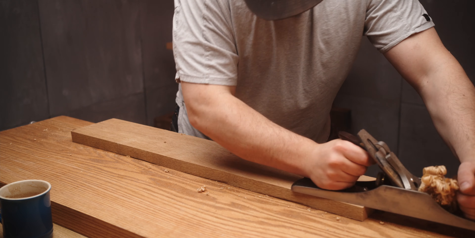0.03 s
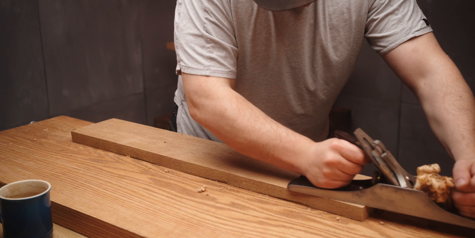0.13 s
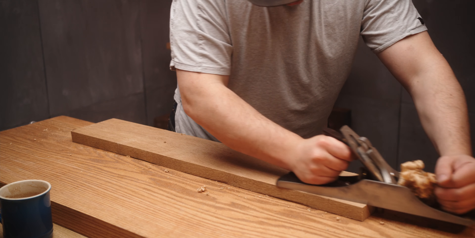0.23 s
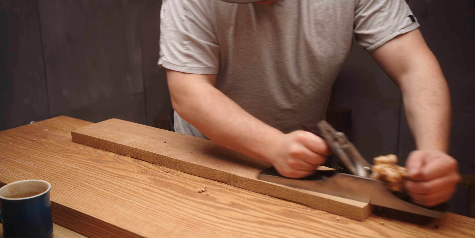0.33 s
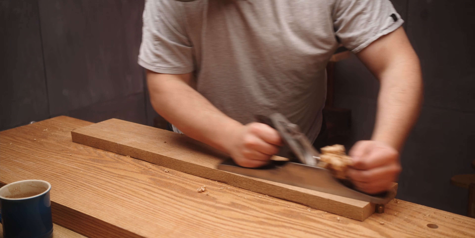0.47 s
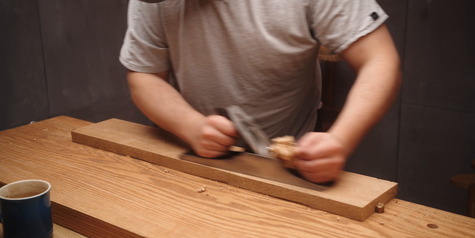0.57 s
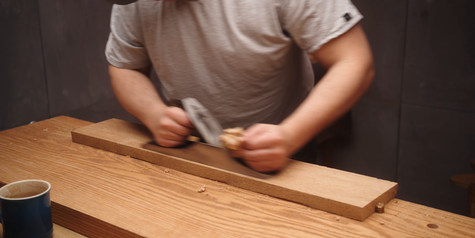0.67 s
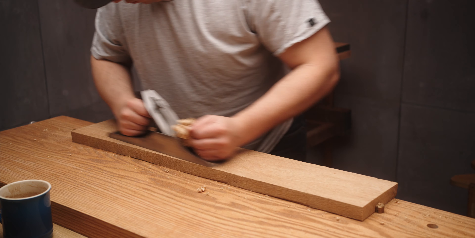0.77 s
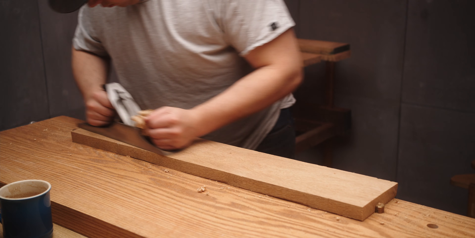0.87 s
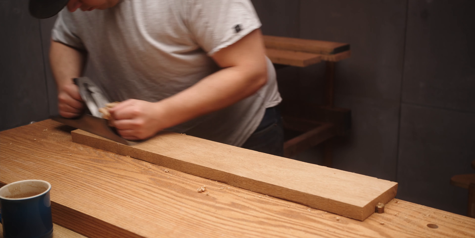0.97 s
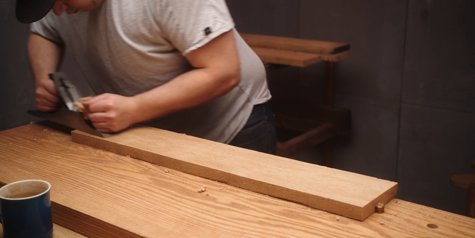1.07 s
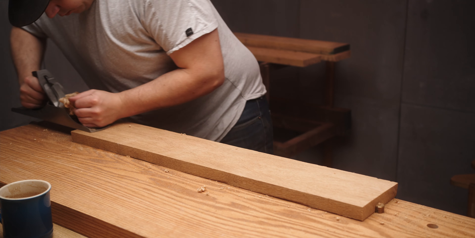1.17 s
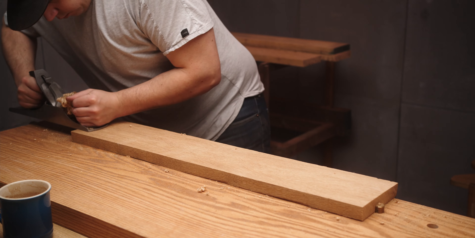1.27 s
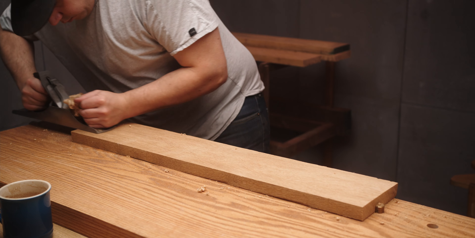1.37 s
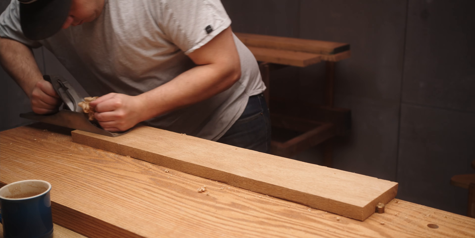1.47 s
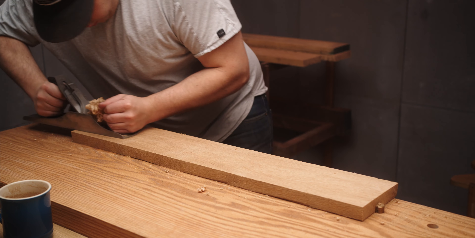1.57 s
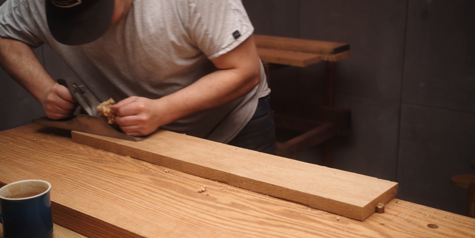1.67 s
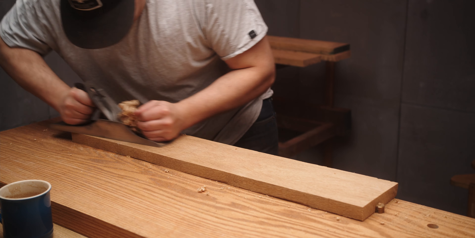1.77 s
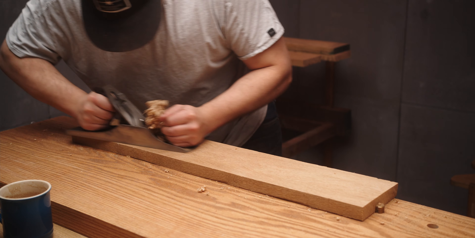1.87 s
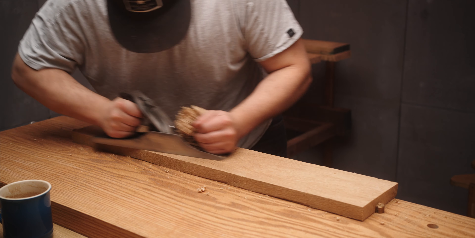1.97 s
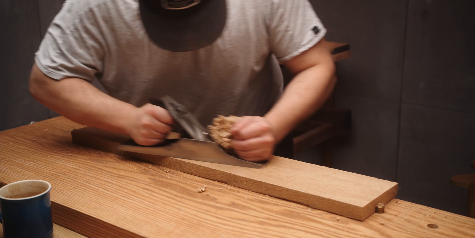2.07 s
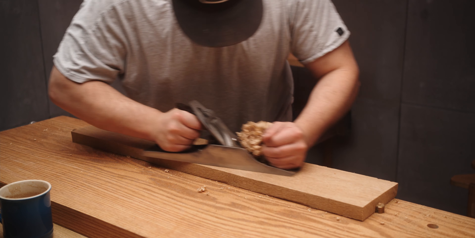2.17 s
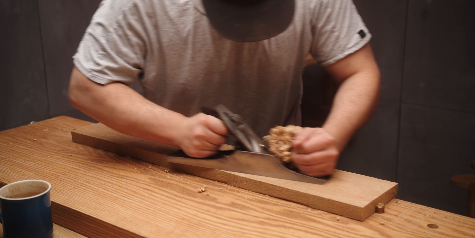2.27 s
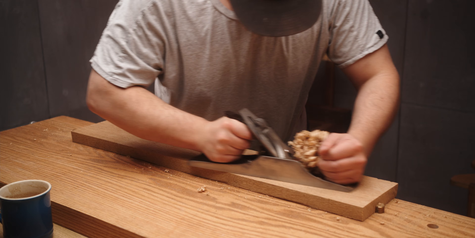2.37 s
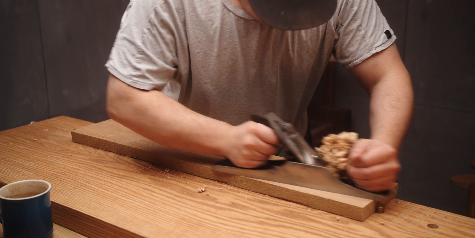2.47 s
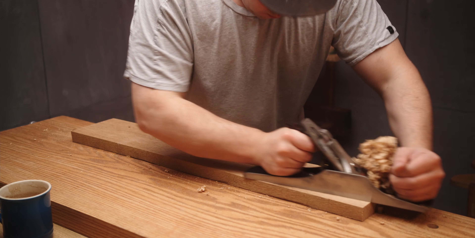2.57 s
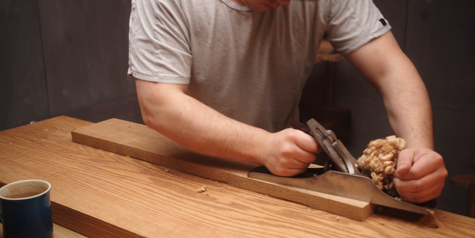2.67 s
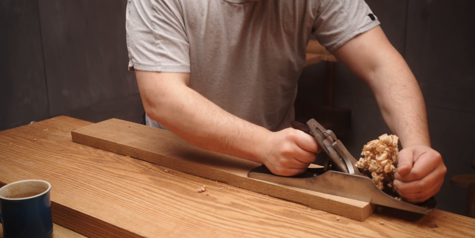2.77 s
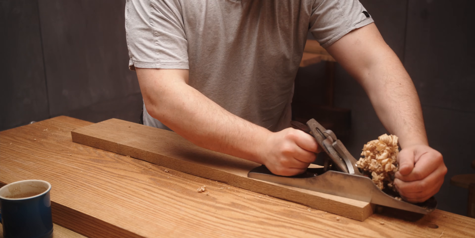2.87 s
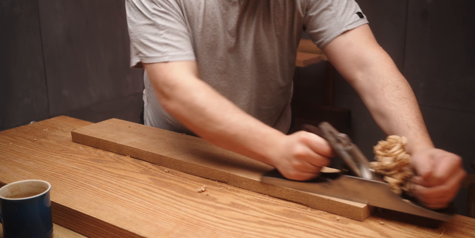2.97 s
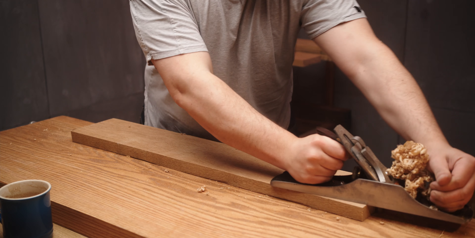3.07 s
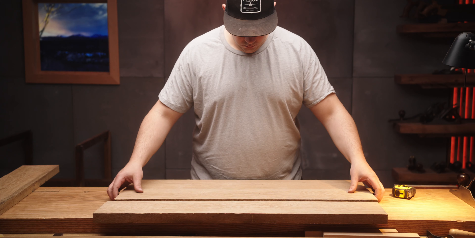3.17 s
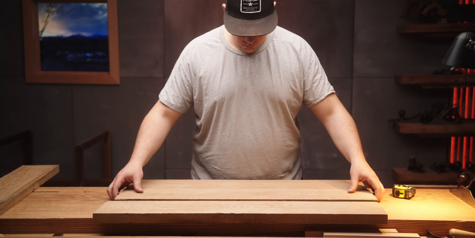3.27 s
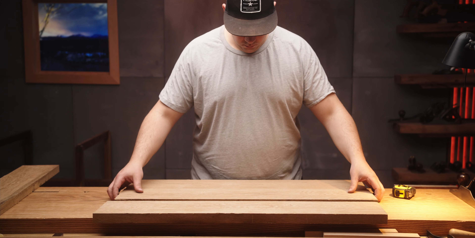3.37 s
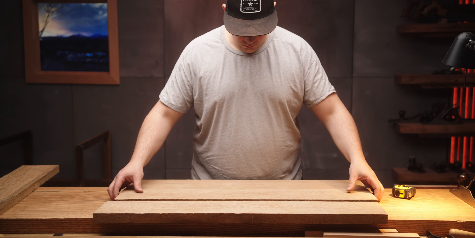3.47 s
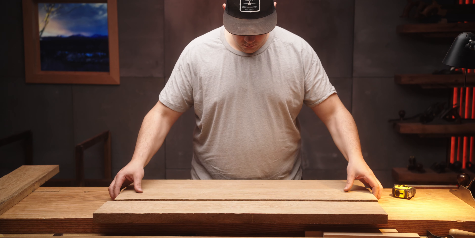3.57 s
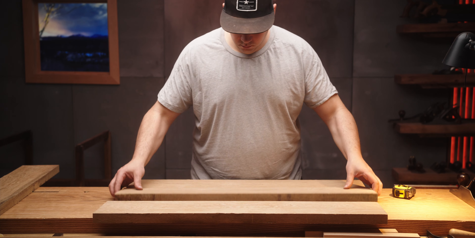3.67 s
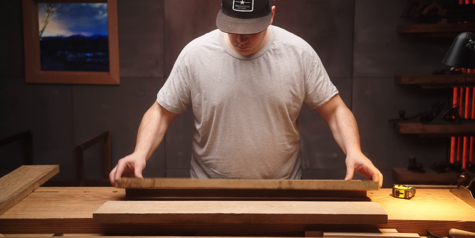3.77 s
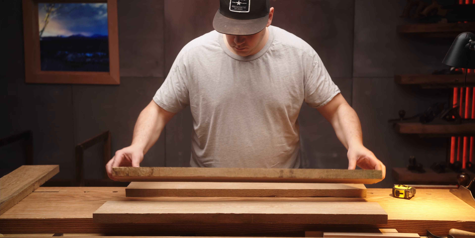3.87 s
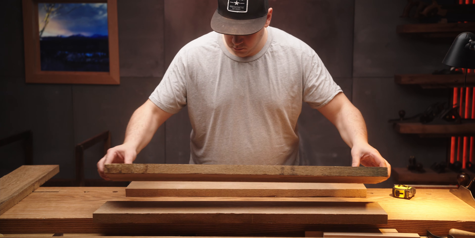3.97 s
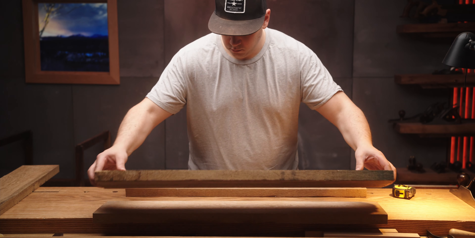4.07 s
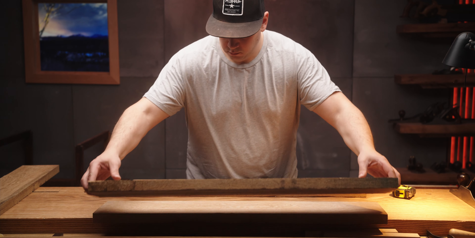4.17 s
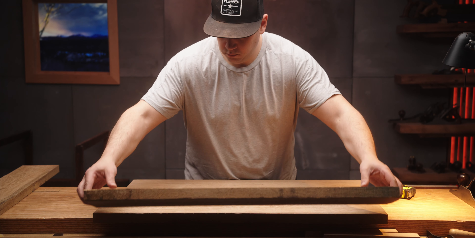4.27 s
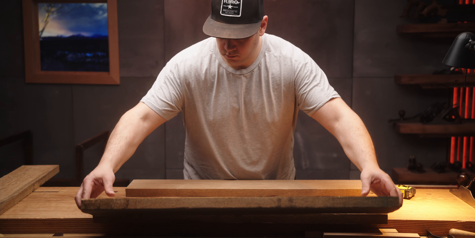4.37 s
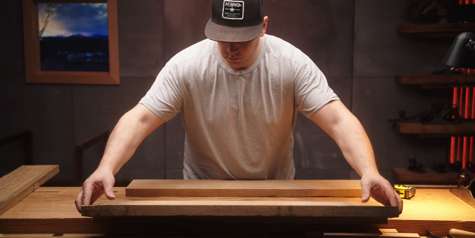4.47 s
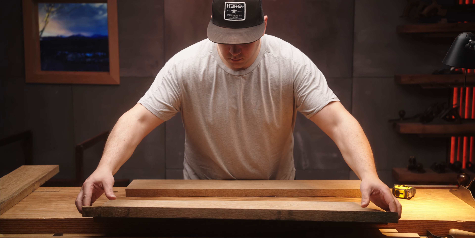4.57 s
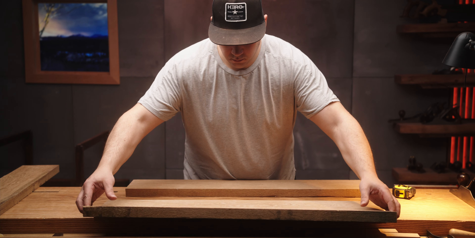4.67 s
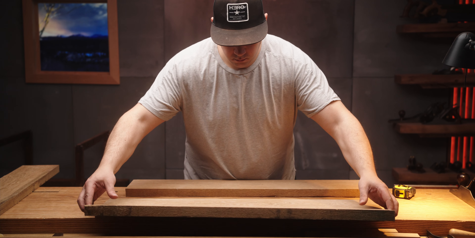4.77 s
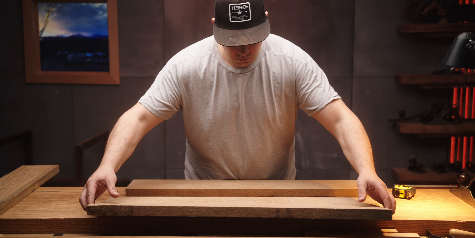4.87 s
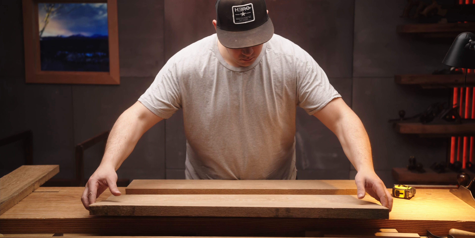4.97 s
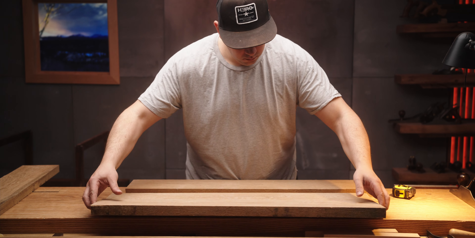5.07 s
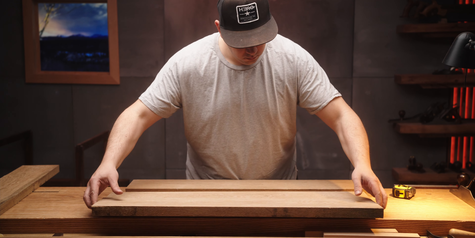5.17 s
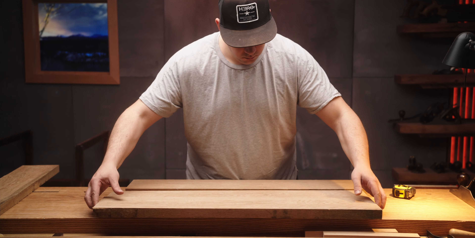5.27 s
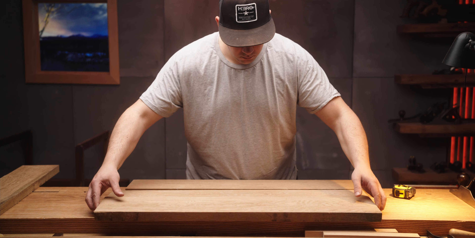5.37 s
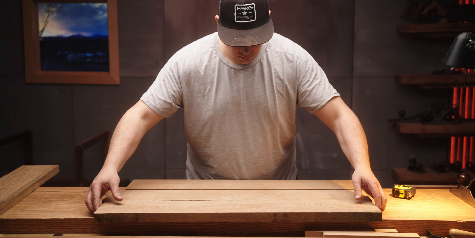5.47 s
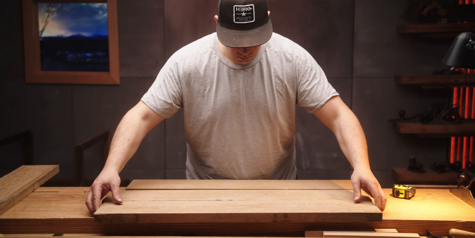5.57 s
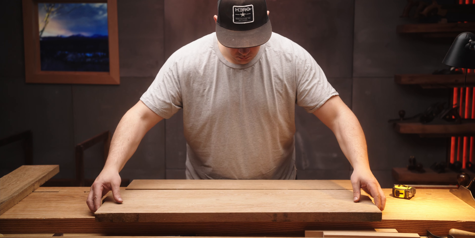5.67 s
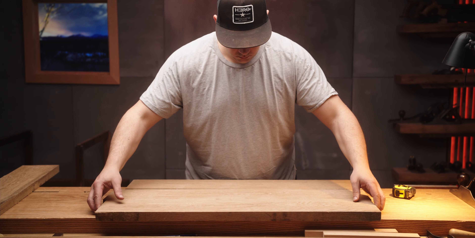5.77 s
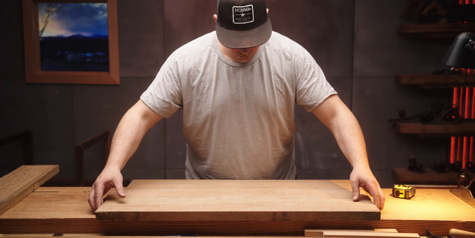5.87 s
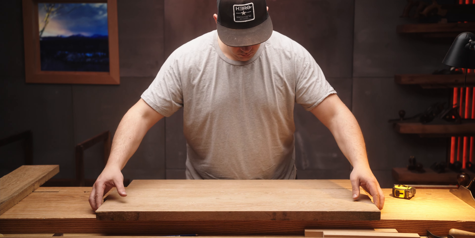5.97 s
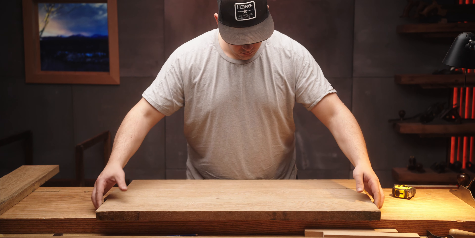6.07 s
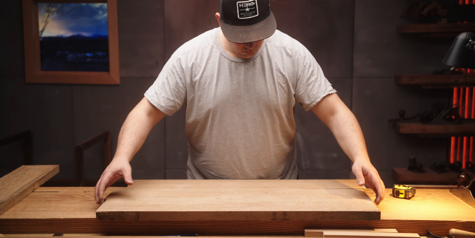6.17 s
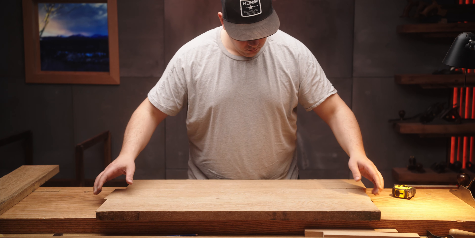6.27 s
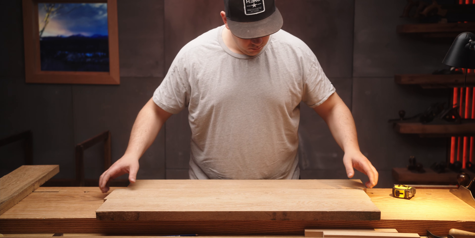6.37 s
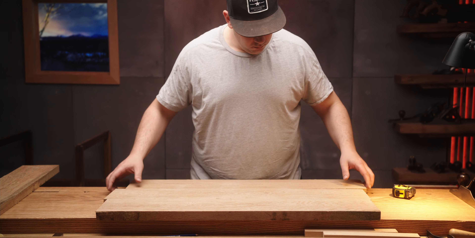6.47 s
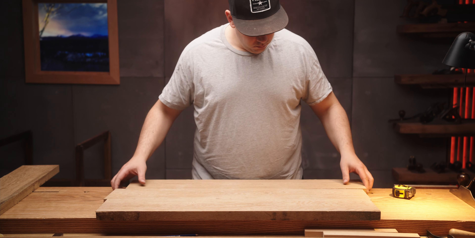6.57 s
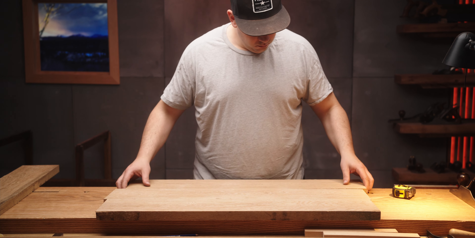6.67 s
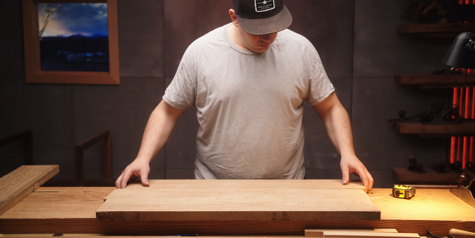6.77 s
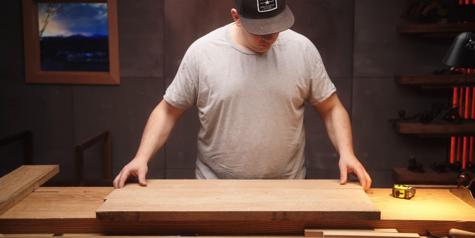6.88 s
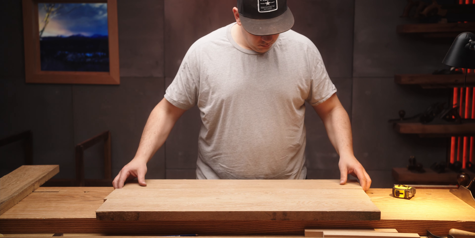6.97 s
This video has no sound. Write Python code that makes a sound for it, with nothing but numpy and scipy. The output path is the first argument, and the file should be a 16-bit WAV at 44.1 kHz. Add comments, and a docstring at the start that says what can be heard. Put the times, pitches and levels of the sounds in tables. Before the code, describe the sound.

A metal hand plane hisses over a wooden board, then a board knocks, slides and slaps down on a workbench.

```python
"""A long metal hand plane is dragged back over a board and pushed through a hissing cut.
Each stroke speeds up and slows: the shaving crackles most at speed, the blade chatters most when slow.
After an abrupt change of scene a board is lifted off a stack, set on edge on the bench,
slid into place and let fall flat. Rumble and a faint hum fill the bare, ringing workshop."""
import sys
import numpy as np
from scipy import signal
from scipy.fft import rfft, irfft, next_fast_len
from scipy.io import wavfile
from scipy.ndimage import uniform_filter1d, map_coordinates

SR = 44100
rng = np.random.default_rng(int(sys.argv[2]) if len(sys.argv) > 2 else 0)


def dump_mix(stems):
    """Bounce the given channels to the path in sys.argv[1] as a 16-bit WAV at rate SR."""
    frames = np.atleast_2d(stems).T  # one column per channel
    limited = np.clip(frames, -1, 1)  # hard clip at full scale
    pcm = np.round(limited * 32767).astype(np.int16)
    wavfile.write(sys.argv[1], SR, pcm)


N = 309582
SCENE_CHANGE_S = 3.176

# cutting edge spectrum: (frequency [Hz], density [dB])
CUT_SPECTRUM = [(1200, -37), (2200, -14.5), (2900, -5.5), (3500, -6), (4300, -0.5), (5000, -4), (6400, -9),
                (7600, -19.5), (9300, -18.5), (10400, -41), (14000, -52.5)]
# shaving and grit spectrum: (frequency [Hz], density [dB])
CRACKLE_SPECTRUM = [(5000, -25), (9000, -2.5), (10400, -11.5), (11700, -2.5), (13000, -6), (14400, -4.5),
                    (15300, -30.5), (16000, -8.5)]
# bench modes: (frequency [Hz], level [dB], t60 [s])
BENCH_MODES = [(61.8, -16, .5), (86.7, 3, 0.17), (110.7, -0.5, 0.37)]


def planing():
    """The sole rubs on the pull; the blade bites on the push, harder in tough grain."""
    # strokes: (start [s], end [s], level [dB], pressure change [dB])
    pulls = [(0.22, 0.45, -59.5, 2.5), (0.464, 1.195, -44.5, -4), (3.005, 3.036, -43, 3)]
    pushes = [(-0.4, 0.025, -41.5, 2.5), (1.38, 1.51, -68.5, 11), (1.524, 2.69, -39.5, 4)]
    # rows hiss, rasp, crackle, chatter: (gain at rest [dB], added at full speed [dB])
    pull_mix = [(-1, 2), (-6.5, 1), (-22, 6), (-4.5, -2.5)]
    push_mix = [(-1, 2), (-14.5, -1.5), (-23, 10.5), (-6, -7)]
    # tough grain: (time [s], lift [dB], half length [s])
    tough_grain = [(0.0, 6.5, 0.015), (1.827, 2, 0.074), (2.09, 1.5, 0.039), (2.483, 3.5, 0.034),
                   (2.616, 7, 0.043)]
    # lift factors [1]: (hiss, rasp, crackle, chatter)
    tough_share = [0.86, 0.55, 1.8, 0.19]
    # rubbing sole: (frequency [Hz], density [dB])
    sole_spectrum = [(1200, -35), (2200, -11), (2800, -5.5), (3400, -2), (4200, -1), (5000, -5.5),
                     (6500, -10.5), (7600, -20), (9300, -24.5), (10400, -40), (14000, -49.5)]
    tough_db = sum(db * np.exp(-((clock() - s) / half_s) ** 2) for s, db, half_s in tough_grain)
    bite = amp(np.outer(tough_share, tough_db))
    pull = stroke(drive(pulls, pull_mix), sole_spectrum, blade_hz=2843, width_hz=160, snaps_per_s=12000,
                  judder_db=-1.83, patchy_db=2.6, tilt_db_oct=0, low_cut_hz=98, left_db=0.2)
    push = stroke(bite * drive(pushes, push_mix), CUT_SPECTRUM, blade_hz=2943, width_hz=350,
                  snaps_per_s=5000, judder_db=1.4, patchy_db=2.3, tilt_db_oct=-3.5, low_cut_hz=363,
                  left_db=1.1)
    return pull + push


def stroke(gains, spectrum, blade_hz, width_hz, snaps_per_s, judder_db, patchy_db, tilt_db_oct,
           low_cut_hz, left_db):
    """Snapping fibres ring the iron body, blade and board; the curling shaving crackles above them."""
    # plane body resonances: (frequency [Hz], width [Hz], lift [dB])
    iron_peaks = [(4220, 84, 5), (4360, 110, -1), (4834, 350, 2.5), (5290, 300, -1), (5860, 1200, 0.5),
                  (6390, 99, 3)]
    # rasping board: (frequency [Hz], density [dB])
    rasp_spectrum = [(30, -23.5), (100, 10), (190, -3), (300, -1.5), (500, -2.5), (750, -4), (1200, -2.5),
                     (2000, -1), (3000, -7.5), (6000, -50)]

    def iron_db(hz):
        peaks_db = sum(db / (1 + (2 * (hz - f) / width) ** 2) for f, width, db in iron_peaks)
        return along(spectrum, hz) + peaks_db

    def blade_db(hz):
        return -10 * np.log10(1 + (2 * (hz - blade_hz) / width_hz) ** 4)

    def board_db(hz):
        cut_db = 10 * np.log10(1 + (low_cut_hz / (hz + 1)) ** 4)
        return along(rasp_spectrum, hz) + tilt_db_oct * np.log2(1 + hz / 200) - cut_db

    hiss, rasp, crackle, chatter = gains * amp(judder_db * wobble(70))
    iron = hiss * unit(colour(patchy(grains(snaps_per_s, spread_db=5), patchy_db), iron_db))
    blade = chatter * unit(colour(grains(snaps_per_s, spread_db=7), blade_db))
    wood = rasp * unit(colour(grains(3000, spread_db=1), board_db))
    shaving = crackle * shaped(patchy(grains(1500, spread_db=1), patchy_db), CRACKLE_SPECTRUM)
    return (pan(workshop(amp(3.5) * iron + amp(1.5) * blade, wet_db=8, places=4), left_db)
            + workshop(amp(4.5) * wood, wet_db=9, places=2)
            + pan(workshop(amp(6) * shaving, wet_db=6.5, places=2), left_db=5))


def drive(strokes, mix):
    """Layer gains: all follow pressure, each with its own response to speed."""
    moves = [movement(*row, attack_s=0.016, release_s=0.015) for row in strokes]
    return np.array([sum(pressure * amp(rest_db + speed_db * speed) for pressure, speed in moves)
                     for rest_db, speed_db in mix])


def movement(start_s, end_s, db, change_db, attack_s, release_s):
    """One arm sweep: drifting pressure gain and a 0-1-0 speed bell."""
    t = clock()
    progress = np.clip((t - start_s) / (end_s - start_s), 0, 1)
    contact = np.clip(1 + np.minimum((t - start_s) / attack_s, (end_s - t) / release_s), 0, 1)
    return contact * amp(db + change_db * (progress - 0.5)), np.sin(np.pi * progress) ** 2


def plane_bumps():
    """The plane bumps over the board: the bench thuds, the sole clacks, the edge scratches."""
    # bumps: (time [s], thud [dB], clack [dB], scratch [dB])
    bumps = [(0.87, -30.5, -49, -62), (0.943, -41, -62, -67), (1.52, -37.5, -47, -31.5),
             (1.58, -39.5, -70, -58), (2.996, -58, -32.5, -55), (3.02, -59, -46, -35)]
    # sole on board: (frequency [Hz], level [dB], t60 [s])
    clack_modes = [(545, 0, 0.05), (600, 5, 0.06), (665, 0, 0.06), (740, -2, 0.06)]
    t = np.arange(SR) / SR
    thuds, clacks, scratches = np.zeros((2, N)), np.zeros((2, N)), np.zeros(N)
    damping = amp(-190 * t)  # plane's weight on the bench
    scratch_envelope = np.exp(-t / 0.017) * (1 - np.exp(-t / 0.0081))
    for s, thud_db, clack_db, scratch_db in bumps:
        add(thuds, s, amp(thud_db) * damping * ring(BENCH_MODES, attack_s=0.0063, lag_s=0.00026))
        add(clacks, s, amp(clack_db) * ring(clack_modes, attack_s=0.0045, lag_s=0.0002))
        scratch = shaped(rng.standard_normal(SR), CUT_SPECTRUM) * scratch_envelope
        add(scratches, s, amp(scratch_db) * scratch)
    return (workshop(thuds, wet_db=-2) + workshop(clacks, wet_db=10.5)
            + pan(workshop(scratches, wet_db=-2.5), left_db=0.5))


def board_knocks():
    """Blows slap the board and ring it and the bench; the springy contact is a resonant low-pass."""
    # blows: (time [s], wood [dB], contact resonance [Hz], Q [1], bench thud [dB])
    blows = [(3.647, -70, 363, 3.4, -57), (3.727, -50, 950, 0.33, -46.5), (3.756, -62, 1000, 0.53, -43.5),
             (4.534, -56.5, 683, 0.47, -53), (4.648, -31, 800, 0.51, -43.5), (4.653, -51, 1400, 4.3, -57),
             (4.668, -39, 521, 3, -74), (5.473, -47.5, 1026, 5.3, -47.5), (5.529, -26.5, 4200, 0.62, -40),
             (5.549, -33.5, 1250, 1.8, -51.5), (5.70, -54, 760, 13, -54), (5.92, -53, 386, 0.71, -58),
             (6.228, -85.5, 825, 64, -98)]
    # board modes: (frequency [Hz], level [dB], uncapped t60 [s])
    board_modes = [(244.2, -4, 0.35), (276.4, 0, 0.65), (299, -5.5, 0.7), (334.5, -4, 0.67),
                   (435, -3.5, 0.61), (521, 4.5, 0.3), (577, -5, 0.95), (641, -4, 0.62), (716, 9, 0.16),
                   (768, -5.5, 0.79), (926, 4, 0.58), (976, -2, 0.78), (1000, 0, 0.51), (1093, -9.5, 0.63),
                   (1360, -4.5, 0.86), (1430, -8.5, 0.58), (1597, -9.5, 0.45), (1630, -5.5, 0.58),
                   (2010, -25, 0.55), (2410, -20.5, .3)]
    # wood slap: (frequency [Hz], density [dB])
    slap_spectrum = [(60, -12.5), (180, -6.5), (260, 2.5), (700, -0.5), (1100, -5), (1600, -4), (1900, -9),
                     (2700, -15.5), (4200, -8.5), (5500, -14), (7500, -16.5), (10000, -21), (15000, -31.5)]
    t = np.arange(SR) / SR
    direct, slaps = np.zeros((2, N)), np.zeros(N)
    for s, db, contact_hz, q, thud_db in blows:
        def contact_db(hz):
            ratio = hz / contact_hz
            return -10 * np.log10((1 - ratio ** 2) ** 2 + (ratio / q) ** 2)

        slap = shaped(rng.standard_normal(SR), slap_spectrum) * np.exp(-t / 0.0075)
        add(slaps, s, amp(db + 9.5) * colour(slap, contact_db))
        first_wave = shaped(rng.standard_normal((2, SR)), slap_spectrum) * np.exp(-t / 0.0041)
        add(direct, s, amp(db - 2) * spread(colour(first_wave, contact_db)))
        board = ring(board_modes, attack_s=0.0014, lag_s=0.00021)
        add(direct, s, amp(db - 1) * colour(board, contact_db))
        add(direct, s, amp(thud_db) * ring(BENCH_MODES, attack_s=0.0037, lag_s=0.00023))
    return direct + workshop(slaps, wet_db=15)


def sliding():
    """Board and palms rub over wood, louder with speed; grit crackles."""
    # slides: (start [s], end [s], level [dB], pressure change [dB], grit offset [dB])
    slides = [(3.634, 3.727, -87, 1, -14), (3.735, 3.834, -80.5, -4.5, -20), (4.542, 4.62, -86.5, -17, -27),
              (4.648, 4.946, -70.5, 9.5, -18), (4.973, 5.146, -64, -2.5, -0.5), (5.157, 5.524, -71, -3, 3),
              (5.73, 6.036, -78.5, -8.5, -3), (6.114, 6.294, -85.5, -6, -5), (6.493, 6.701, -92, 5, 8),
              (6.717, 6.805, -86, 3.5, 9), (6.857, 6.992, -75, 4, -21)]
    # wood friction: (frequency [Hz], density [dB])
    rub_spectrum = [(47, -63), (80, -22), (111, -4), (179, -12), (287, -3.5), (367, -8), (654, -8.5),
                    (771, -8.5), (1120, -16), (1400, -10.5), (2400, -14.5), (4010, -11.5), (11000, -35.5),
                    (14300, -58.5), (22000, -120)]
    rub_gain, grit_gain = np.zeros(N), np.zeros(N)
    judder, full_speed_db = amp(wobble(35)), 2
    for start_s, end_s, db, change_db, grit_db in slides:
        pressure, speed = movement(start_s, end_s, db, change_db, attack_s=0.02, release_s=0.025)
        friction = pressure * amp(full_speed_db * speed) * judder
        rub_gain += friction
        grit_gain += amp(grit_db) * friction
    rub = amp(13.5) * rub_gain * shaped(grains(5000, spread_db=1.5), rub_spectrum)
    grit = amp(-1) * grit_gain * shaped(grains(700, spread_db=6.5), CRACKLE_SPECTRUM)
    return pan(workshop(rub, wet_db=7, places=2), left_db=-0.6) + workshop(grit, wet_db=7.5)


def splinters():
    """Splinters catch with short bright ticks."""
    # catches: (time [s], level [dB])
    catches = [(4.9644, -72), (5.3344, -45), (5.7713, -61), (5.8744, -62), (6.4906, -56.5)]
    # splinter tick: (frequency [Hz], density [dB])
    tick_spectrum = [(1500, -25), (4000, 3), (8000, -10), (12500, 1), (15500, -6)]
    t, ticks = np.arange(SR // 20) / SR, np.zeros(N)
    for s, db in catches:
        tick = shaped(rng.standard_normal(len(t)), tick_spectrum) * np.exp(-t / 0.0045)
        add(ticks, s, amp(db - 5.5) * tick)
    return workshop(ticks, wet_db=6)


def background():
    """Air, rumble and a wavering hum; the second scene has less air, more rumble and low swells."""
    # room noise: (frequency [Hz], density [dB])
    air_spectrum = [(150, 0), (260, -1), (400, -6), (1200, -13), (2600, -17), (4500, -15), (8500, -18),
                    (10500, -23), (15500, -25)]
    rumble_spectrum = [(10, -24), (22, -2), (32, 1.5), (45, -8), (58, -1.5), (75, -14), (100, -23.5),
                       (200, -51.5), (600, -120)]
    # noise levels: (first scene [dB], second scene [dB])
    air_db = [-75, -79.5]
    rumble_db = [-70.5, -68.5]
    # dull swells: (time [s], frequency [Hz], level [dB], half length [s])
    swells = [(4.049, 45.5, -39.5, 0.031), (4.097, 53.5, -49.5, 0.078), (4.363, 30, -53, 0.096)]
    t = clock()

    def noise(spectrum, levels_db):
        gain = amp(np.where(t < SCENE_CHANGE_S, *levels_db))
        return gain * unit(spread(shaped(rng.standard_normal((2, N)), spectrum)))

    air, rumble = noise(air_spectrum, air_db), noise(rumble_spectrum, rumble_db)
    hum_hz, hum_db, waver_rad = 300, -86.5, 1.2
    hum = amp(hum_db + 2 * wobble(14)) * np.sin(2 * np.pi * hum_hz * t + waver_rad * wobble(25))
    booms = sum(amp(db) * np.exp(-((t - s) / half_s) ** 2) * np.sin(2 * np.pi * hz * (t - s))
                for s, hz, db, half_s in swells)
    return air + hum + pan(rumble + booms, left_db=3)


def workshop(x, wet_db, places=1):
    """Direct sound plus echo at constant power; a moving source cycles through one echo per place."""
    x, wet = np.atleast_2d(x), np.zeros((2, N))
    end = np.flatnonzero(abs(x[0]) > 1e-7)[-1]
    place = np.arange(end) // (SR // 8) % places
    for k in range(places):
        add(wet, 0, signal.fftconvolve(x[:, :end] * (place == k), echo(), axes=1))
    return (x + amp(wet_db) * wet) / np.hypot(1, amp(wet_db))


def echo():
    """Diffuse stereo tail: near walls answer first, treble dies soonest."""
    # room decay: (frequency [Hz], t60 [s])
    room_decay = [(80, 0.77), (300, .85), (1000, 0.7), (2900, 0.64), (4500, 0.59), (8000, 0.54),
                  (14000, 0.3)]
    hz, t, noise = signal.stft(rng.standard_normal((2, SR)), SR, nperseg=256)
    t60_s = along(room_decay, hz)[:, None]
    near_walls = 1 + 0.65 * np.exp(-t / 0.011)
    decaying = noise * near_walls * amp(-60 * t / t60_s) / np.sqrt(t60_s)
    tail = spread(signal.istft(decaying, SR, nperseg=256)[1])
    return tail / np.linalg.norm(tail, axis=1, keepdims=True)


def ring(modes, attack_s, lag_s):
    """One second of decaying modes, each with a random lag to either ear."""
    t = np.arange(SR) / SR
    hz, db, t60_s = np.transpose(modes)[:, :, None, None]
    delay_s = lag_s * rng.standard_normal((len(modes), 2, 1))
    size = amp(db + rng.standard_normal(db.shape))
    decay = amp(-60 * t / np.minimum(t60_s, 0.62))  # wood on a bench rings no longer
    waves = size * decay * np.sin(2 * np.pi * hz * (t - delay_s))
    return waves.sum(0) * (1 - np.exp(-t / attack_s)) / np.sqrt(np.sum(size ** 2) / 2)


def grains(per_s, spread_db):
    """Wood fibre snaps, random in time and size."""
    snaps = rng.random(N) < per_s / SR
    return snaps * rng.standard_normal(N) * amp(spread_db * rng.standard_normal(N))


def patchy(x, depth_db):
    """Bright and dull patches come and go across the spectrum."""
    frames = signal.stft(x, nperseg=512)[2]
    field = uniform_filter1d(rng.standard_normal(frames.shape), size=9, axis=0)
    field = uniform_filter1d(field, size=10, axis=1)
    return signal.istft(frames * amp(depth_db * unit(field)), nperseg=512)[1][:N]


def wobble(knots_per_s):
    """Random curve, linear between knots."""
    knots = rng.standard_normal(int(N * knots_per_s / SR) + 4)
    return map_coordinates(knots, [clock() * knots_per_s], order=1)


def colour(x, gain_db):
    """Minimum-phase filter with response gain_db(hz)."""
    n = x.shape[-1]
    m = 2 * next_fast_len(n // 2 + 4096)
    cepstrum = irfft(np.log(amp(gain_db(np.fft.rfftfreq(m, 1 / SR))) + 1e-6))
    cepstrum[1:m // 2] *= 2
    cepstrum[m // 2 + 1:] = 0
    return irfft(rfft(x, m) * np.exp(rfft(cepstrum)), m)[..., :n]


def shaped(x, spectrum):
    """Filter by a spectrum table, to rms 1."""
    return unit(colour(x, lambda hz: along(spectrum, hz)))


def spread(pair):
    """Mid and side to stereo, alike in the bass."""
    side_gain = [(120, -17), (220, -11), (450, -2), (900, 1), (3000, 2)]  # (frequency [Hz], gain [dB])
    side = colour(pair[1], lambda hz: along(side_gain, hz))
    return np.array([pair[0] + side, pair[0] - side])


def pan(x, left_db):
    return x * amp([[left_db / 2], [-left_db / 2]])


def add(track, start_s, x):
    part = track[..., round(start_s * SR):][..., :x.shape[-1]]
    part += x[..., :part.shape[-1]]


def along(points, hz):
    """Interpolate over log frequency."""
    knots_hz, values = np.transpose(points)
    return np.interp(np.log(hz + 1), np.log(knots_hz), values)


def amp(db):
    return 10 ** (np.asarray(db) / 20)


def unit(x):
    return x / np.sqrt(np.mean(x ** 2) + 1e-20)


def clock():
    return np.arange(N) / SR


def scene():
    """Plane and echo stop dead at the change of scene; the board work follows."""
    first_scene = np.clip((SCENE_CHANGE_S - clock()) / 0.0023, 0, 1)
    plane = first_scene * (planing() + plane_bumps())
    return plane + board_knocks() + sliding() + splinters() + background()


def record(dry):
    """Brick-wall low-pass."""
    top_hz = 15730
    m = next_fast_len(N + SR // 2)
    return irfft(rfft(dry, m) * (np.fft.rfftfreq(m, 1 / SR) < top_hz), m)[:, :N]


dry = scene()
out = record(dry)
dump_mix(out)
```